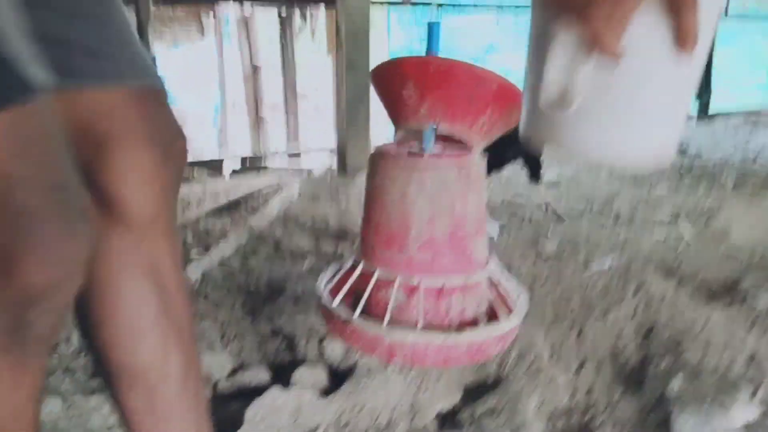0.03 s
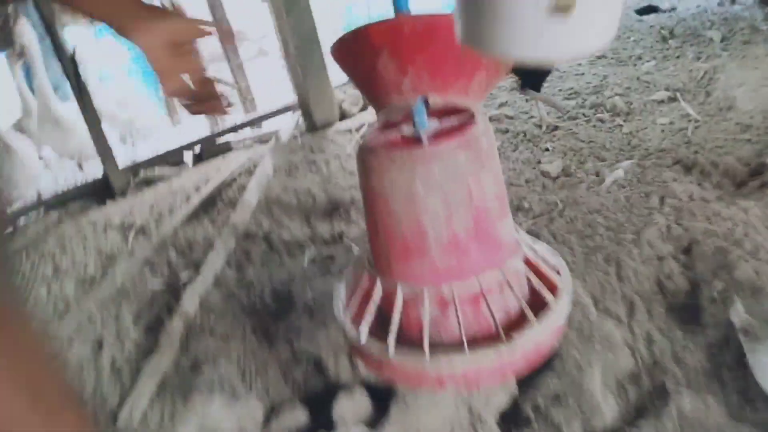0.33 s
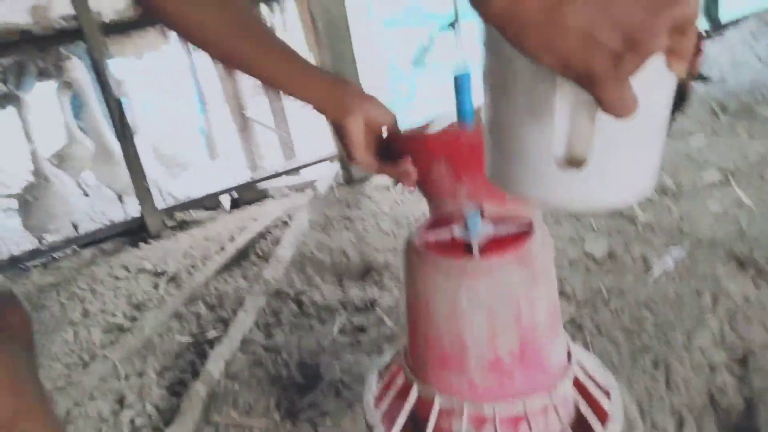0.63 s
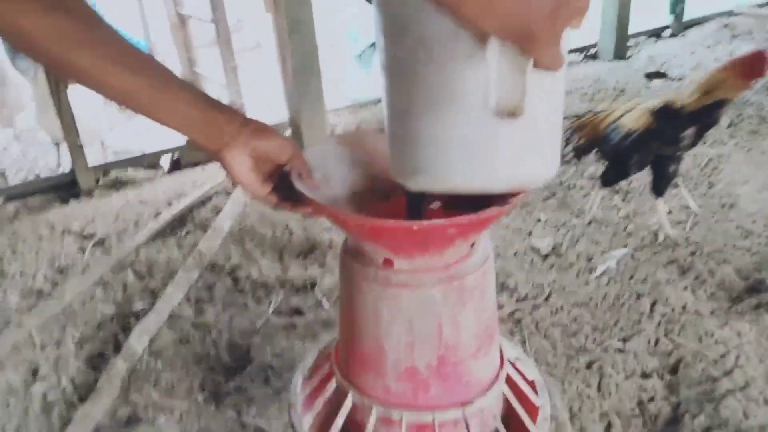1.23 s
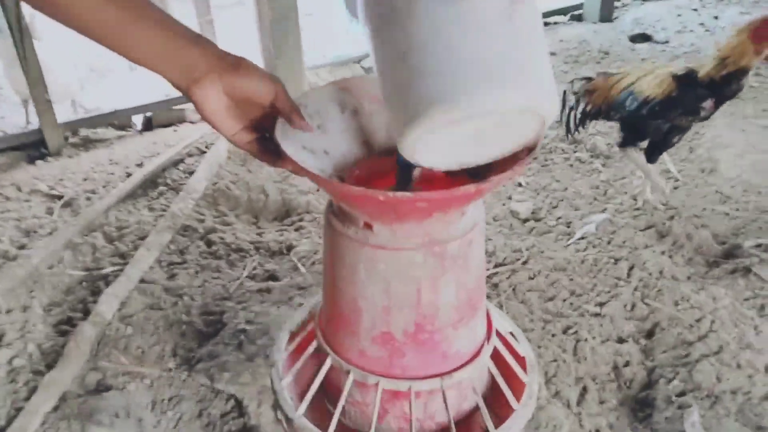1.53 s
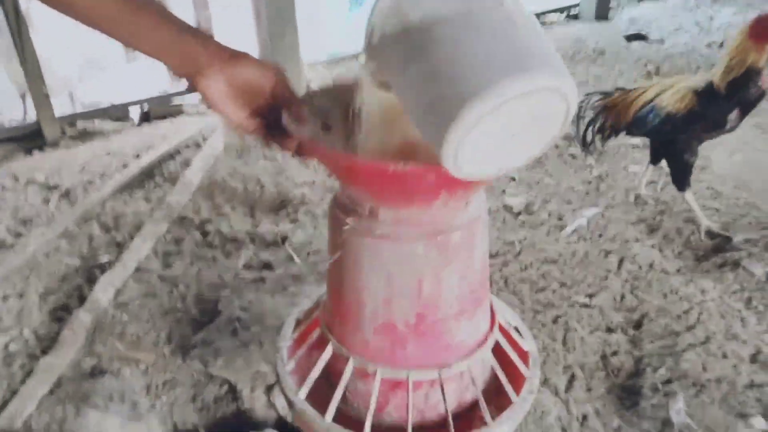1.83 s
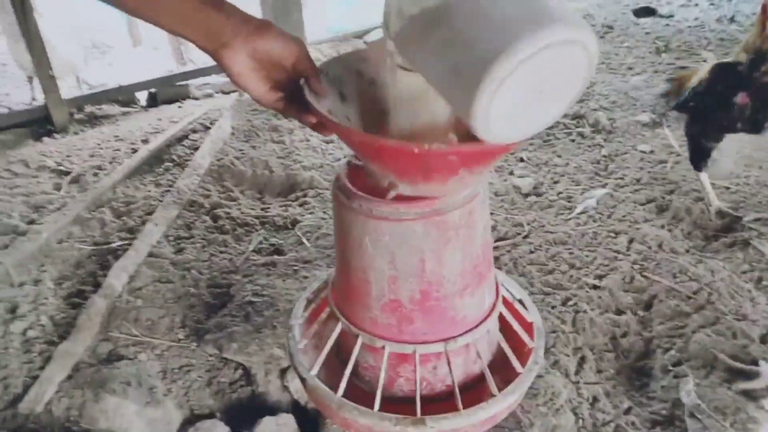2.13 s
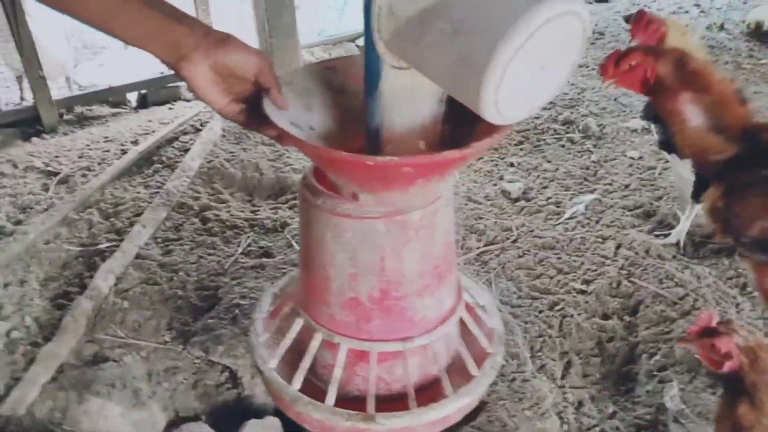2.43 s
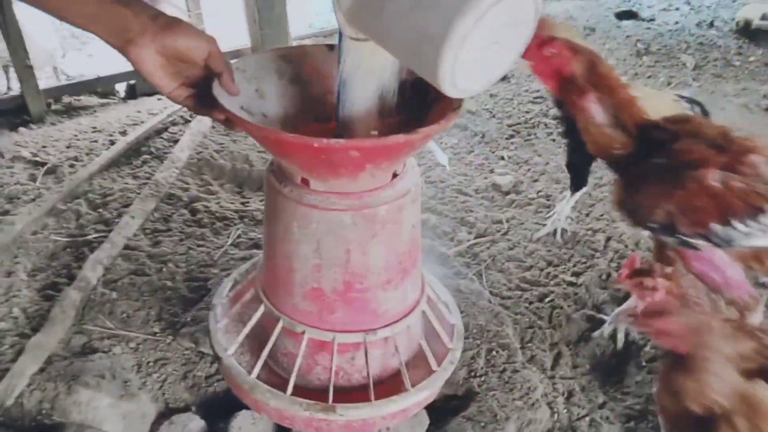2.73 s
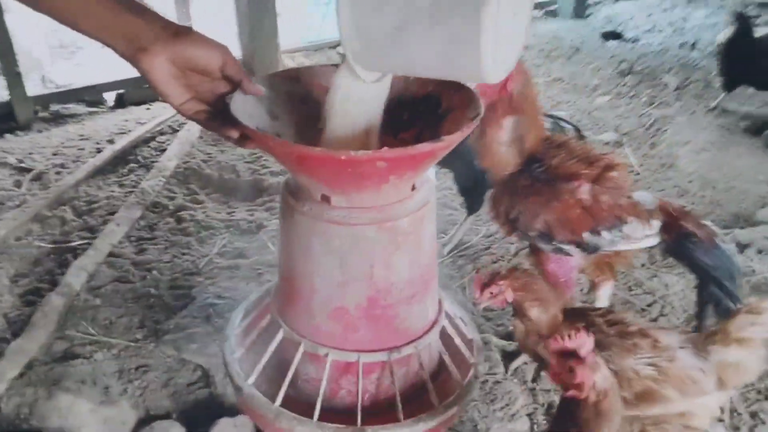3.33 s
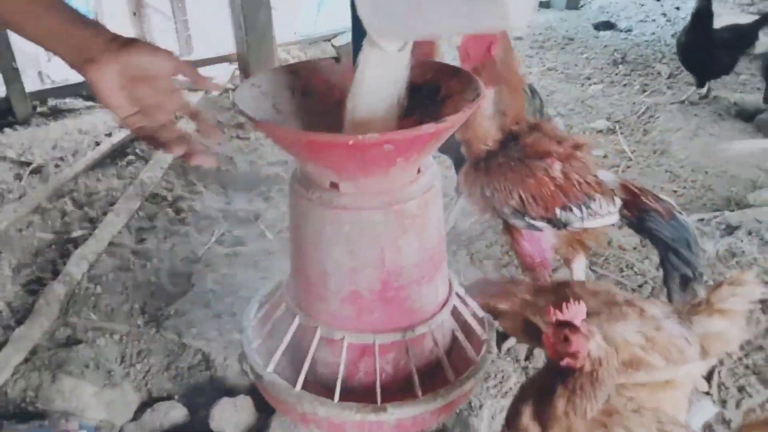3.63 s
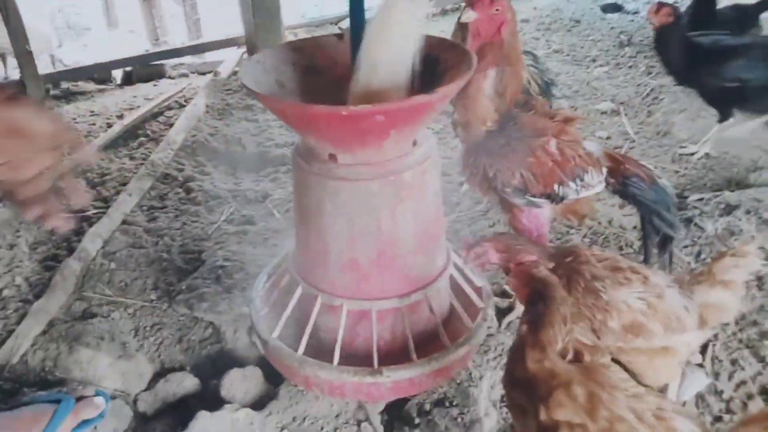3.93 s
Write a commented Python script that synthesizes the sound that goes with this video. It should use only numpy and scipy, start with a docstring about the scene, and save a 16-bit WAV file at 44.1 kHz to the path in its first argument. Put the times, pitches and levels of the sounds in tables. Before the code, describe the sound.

A chicken squawks hoarsely close by, then dry feed rushes through a plastic funnel.

```python
"""Feeding time in a dirt pen, with insects whining faintly behind. A chicken close by opens with
the first of four hoarse, drawn-out squawks: rasping throat pulses shaped by the beak. After a second
a plastic bucket knocks on a funnel and rings the hanging plastic feeder below it. Just before two
seconds dry feed starts to rush and hiss through the funnel and runs to the end, with a few more knocks.
Short clucks, sparse at first, come quicker after the last squawk as the birds gather."""
import sys
import numpy as np
from scipy import signal
from scipy.fft import rfft, irfft, next_fast_len
from scipy.io import wavfile
from scipy.ndimage import map_coordinates

SR = 44100
rng = np.random.default_rng(int(sys.argv[2]) if len(sys.argv) > 2 else 0)


def transcribe(signal):
    """Save signal, clipped to [-1, 1], as a 16-bit WAV file at the path in sys.argv[1]."""
    frames = np.atleast_2d(signal).T
    limited = np.clip(frames, -1, 1)
    pcm = np.round(limited * 32767).astype(np.int16)
    wavfile.write(sys.argv[1], SR, pcm)


N = 176400

# Stereo width of air and feed. Each row: frequency in Hz, left-right likeness (1 is mono).
STEREO_LIKENESS = [(150, 0.85), (400, 0.39), (950, 0.027)]
# Three throat tones for the squawks to choose from. Each row: frequency in Hz, gain in dB.
THROAT_1 = [(100, -13.5), (300, -9.5), (430, -17.5), (780, 0), (1000, -6.5), (1750, 1), (2350, -6),
            (2750, -4), (3750, -5.5), (7500, -30), (15000, -30.5)]
THROAT_2 = [(280, -2), (430, -18), (640, -0.5), (1400, 2), (1620, -9), (1800, 7.5), (2200, -6), (2400, 0),
            (2650, -10), (3650, -6), (4300, -18), (15000, -36.5)]
THROAT_3 = [(430, -21.5), (760, 0), (1150, 1), (2050, -1), (3150, -9.5), (3650, 4), (4200, -13),
            (8000, -31.5), (15000, -25.5)]
BEAK_DB = -11  # a beak resonance against the throat sound


def amp(db):
    return 10 ** (np.asarray(db) / 20)


def unit(x):
    return x / np.sqrt(np.mean(x ** 2) + 1e-20)


def along(points, hz):
    """Read a curve of (Hz, value) points on a log frequency axis."""
    freqs, values = np.transpose(points)
    return np.interp(np.log(hz + 1), np.log(freqs + 1), values)


def wobble(rate):
    """A smooth random curve, rate knots a second."""
    knots = rng.standard_normal(int(N * rate / SR) + 4)
    return map_coordinates(knots, [np.arange(N) * rate / SR])


def filtered(x, response):
    """Shape x with a gain given as a function of frequency."""
    n = x.shape[-1]
    padded = next_fast_len(n + 8192)
    return irfft(rfft(x, padded) * response(np.fft.rfftfreq(padded, 1 / SR)), padded)[..., :n]


def coloured(x, points, size=4096):
    """Minimum-phase EQ through (Hz, dB) points."""
    cepstrum = irfft(np.log(amp(along(points, np.fft.rfftfreq(size, 1 / SR)))))
    cepstrum[1:size // 2] *= 2
    cepstrum[size // 2 + 1:] = 0
    return signal.fftconvolve(x, irfft(np.exp(rfft(cepstrum))))[:len(x)]


def add(track, start_s, x):
    """Mix x into the track at start_s."""
    i = max(round(start_s * SR), 0)
    track[i:i + len(x)] += x[:max(N - i, 0)]


def panned(x, db):
    """Left louder than right by db."""
    return x * amp(np.array([[db], [-db]]) / 2)


def spread(pair, colour):
    """Two unrelated noises as coloured stereo of rms 1, narrow in the bass and wide on top."""
    def mid_side_gains(hz):
        angle = np.arccos(np.clip(along(STEREO_LIKENESS, hz), -1, 1)) / 2
        return amp(along(colour, hz)) * [np.cos(angle), np.sin(angle)]
    mid, side = filtered(pair, mid_side_gains)
    return unit(np.array([mid + side, mid - side]))


def pen(x, echo_db, left_lead_s=0, t60=.09):
    """Direct sound in stereo plus short echoes from ground, feeder and fence."""
    # Echo tone. Each row: frequency in Hz, level over the direct sound in dB before echo_db is added.
    echo_colour = [(300, 5), (1100, 14)]
    _, t, spectrum = signal.stft(rng.standard_normal((2, SR // 4)), SR, nperseg=256)
    tail = signal.istft(spectrum * amp(-60 * t / t60), SR, nperseg=256)[1]
    wet = signal.fftconvolve(x[None], tail / np.linalg.norm(tail[0]), axes=1)[:, :N]
    echo = lambda hz: amp(along(echo_colour, hz) + echo_db)
    lead = lambda hz: np.exp(1j * np.pi * hz * left_lead_s * np.array([[1], [-1]]))
    direct = filtered(x, lambda hz: lead(hz) / np.hypot(1, echo(hz)))
    return direct + filtered(wet, lambda hz: echo(hz) / np.hypot(1, echo(hz)))


def yard():
    """A bed of quiet outdoor air with a narrow insect whine and its octave."""
    # Tone of the air. Each row: frequency in Hz, gain in dB.
    air_colour = [(25, -16.5), (86, -14), (457, -22), (15500, -40.5)]
    air_db, insect_db, insect_hz = -47.5, -58.5, 5400
    air = spread(rng.standard_normal((2, N)), air_colour)
    band = lambda hz, centre: np.exp(-((hz - centre) / 380) ** 2)
    whine_bands = lambda hz: band(hz, insect_hz) + 0.81 * band(hz, 2 * insect_hz)
    whine = unit(filtered(rng.standard_normal((2, N)), whine_bands))
    return amp(air_db) * air + amp(insect_db) * whine


def syrinx(cycles, rasp, jitter_s=.00003, scatter_db=1.8):
    """A bird's voice: one uneven pulse and one puff of air per cycle; rasp is the air's share of power."""
    n = len(cycles)
    air = unit(rng.standard_normal(n) * np.exp(np.cos(2 * np.pi * cycles)))
    onsets = np.interp(np.arange(1, int(cycles[-1])), cycles, np.arange(n))
    chance = rng.standard_normal((len(onsets), 2))
    onsets += jitter_s * SR * chance[:, 0]
    taps = np.floor(onsets)[:, None] + np.arange(-7, 9)
    offset = taps - onsets[:, None]
    shapes = np.sinc(offset) * np.cos(np.pi * offset / 16) ** 2  # pulses can land between samples
    shapes *= amp(scatter_db * chance[:, 1:])
    pulses = np.bincount(np.clip(taps, 0, n - 1).astype(int).ravel(), shapes.ravel(), n)
    return np.sqrt(1 - rasp) * unit(pulses - pulses.mean()) + np.sqrt(rasp) * air


def beak(voice, hz, width_hz=74):
    """The beak's narrow resonance, its centre following hz, at rms 1."""
    spin = np.exp(2j * np.pi * np.cumsum(hz) / SR)
    pole = np.exp(-np.pi * width_hz / SR)
    return unit(np.real(spin * signal.lfilter([1 - pole], [1, -pole], voice / spin)))


def clucks():
    """Short, soft-edged notes of slightly falling pitch; the beak lifts a different harmonic in each."""
    # Each row: middle in seconds, length in seconds, pitch in Hz, level in dB, beak resonance in Hz.
    notes = [(0.858, 0.029, 252, -24, 556), (1.416, 0.02, 296.7, -18, 890), (1.76, 0.028, 221.8, -23, 2760),
             (2.275, 0.049, 261.3, -23, 1310), (2.462, 0.022, 254.8, -17.5, 1270),
             (2.571, 0.023, 296, -24, 590), (2.711, 0.025, 289, -20, 1210),
             (2.84, 0.026, 289.4, -21.5, 1130), (2.989, 0.031, 268.4, -20.5, 1080)]
    # Tone of the clucking throat. Each row: frequency in Hz, gain in dB.
    throat = [(70, -53), (250, -2), (560, 0), (1300, 0.5), (2700, -13.5), (8000, -45)]
    out, t = np.zeros(N), np.arange(-SR // 10, SR // 10) / SR
    fall = np.exp(-2.5 * t)
    for middle, length, hz, db, beak_hz in notes:
        voice = unit(coloured(syrinx(np.cumsum(hz * fall) / SR, rasp=.28), throat))
        swell = amp(db) * np.exp(-2 * np.pi * (t / length) ** 2)
        add(out, middle + t[0], swell * (voice + amp(BEAK_DB) * beak(voice, beak_hz * fall)))
    return panned(pen(out, echo_db=-7.5), db=2.5)


def squawks():
    """Hoarse calls: pitch and level arch with effort, the beak glides, two clean harmonics add body."""
    # Each row: start and end in seconds, top pitch in Hz, level in dB, second harmonic against the
    # call in dB, beak resonance at the start and at the end in Hz, throat tone.
    calls = [(-.05, 0.373, 169.8, -17, -15, 1330, 1126, THROAT_1),
             (0.602, 0.912, 152.2, -22.5, -37, 1400, 1433, THROAT_2),
             (1.326, 1.747, 162.1, -17.5, -26.5, 1240, 1340, THROAT_3),
             (1.963, 2.251, 135.3, -25, -16, 1250, 1330, THROAT_3)]
    rest_hz, fundamental_db, effort_db, attack_s, release_s = 111, -18.5, 3, 0.019, 0.099
    out, t = np.zeros((2, N)), np.arange(N) / SR
    for start, end, top_hz, db, second_db, beak_from_hz, beak_to_hz, throat in calls:
        progress = np.clip((t - start) / (end - start), 0, 1)
        effort = np.sin(np.pi * progress ** 1.3)  # crests just past the middle
        hz = rest_hz + (top_hz - rest_hz) * effort
        cycles = np.cumsum(hz * (1 + .012 * wobble(60))) / SR
        fades = np.clip((t - start) / attack_s, 0, 1) * np.clip((end - t) / release_s, 0, 1)
        level = fades * amp(db + effort_db * (effort - 1) + 1.1 * wobble(39.6))
        voice = unit(coloured(syrinx(cycles, rasp=.33), throat))
        beak_hz = beak_from_hz + (beak_to_hz - beak_from_hz) * progress
        resonances = beak(voice, beak_hz) + effort ** 2 * beak(voice, 2.33 * beak_hz)
        call = level * unit(voice + amp(BEAK_DB) * resonances)
        phase = 2 * np.pi * cycles
        body = amp(fundamental_db) * np.sin(phase) + amp(second_db) * np.sin(2 * phase)
        out += panned(pen(call, echo_db=-5, left_lead_s=0.00024), db=4)
        out += np.sqrt(2) * level * body  # dry and centred
    return out


def bucket_knocks():
    """Each contact thuds and rings the hollow feeder; a hard one also cracks and rings its thin wall."""
    # Each row: start in seconds, then the levels of ring, thud and clack in dB.
    contacts = [(1.062, -39, -30.5, -36.5), (1.1, -4, -13, -16), (1.1118, -13, -24, -29),
                (1.129, -6, -18, -27), (1.347, -40, -20.5, -55), (1.364, -35, -15, -21),
                (1.3765, -6, -21, -23.5), (2.238, -16, -13, -24), (2.282, -24, -21, -39),
                (2.732, -30, -19.5, -33), (3.92, -38, -28.5, -15.5)]
    # Modes of the plastic feeder. Each row: frequency in Hz, gain in dB, seconds to fall by 60 dB.
    modes = [(250, -12, .06), (345, 0, .13), (517, -3, .08), (830, -10, .06), (1380, -4, .075),
             (2670, -4, .08)]
    # Tones of the dull thud and the bright clack. Each row: frequency in Hz, gain in dB.
    thud_colour = [(40, -28), (150, -13.5), (280, -11), (1500, -36), (12000, -68)]
    clack_colour = [(100, -38), (600, 15), (1600, 3), (3800, -0.5), (9000, -22)]
    wall_hz = 1000  # modes above belong to the wall, those below to the hollow
    rise_s, crack_db = .002, 12
    out, t = np.zeros(N), np.arange(SR // 3) / SR
    decay = lambda t60: amp(-60 * t / t60)
    noise = lambda colour: unit(coloured(rng.standard_normal(len(t)), colour))
    rise = 1 - np.exp(-t / rise_s)
    for start, ring_db, thud_db, clack_db in contacts:
        ring = np.zeros(len(t))
        for hz, db, t60 in modes:
            drive_db = ring_db if hz < wall_hz else clack_db
            ring += amp(db + drive_db) * decay(t60) * np.sin(2 * np.pi * hz * t)
        thud = noise(thud_colour) * decay(t60=0.076)
        clack = noise(clack_colour) * (decay(t60=0.07) + amp(crack_db) * decay(t60=0.008))
        add(out, start, rise * (amp(ring_db) * ring + amp(thud_db) * thud) + amp(clack_db) * clack)
    return pen(out, echo_db=-11)  # the knocks carry little echo


def grains(per_s=18000):
    """Countless tiny impacts of random size, in two unrelated streams."""
    hits = rng.random((2, N)) < per_s / SR
    return hits * rng.standard_normal((2, N))


def feed_pour():
    """Feed strikes the funnel: a hollow rush that flutters with the flow, and a steadier fine hiss."""
    # The flow. Each row: time in seconds, rush in the funnel in dB, hiss of fine grains in dB.
    flow = [(1.81, -81, -89), (1.822, -39, -32), (1.94, -33, -31.5), (2.02, -20.5, -24.5), (2.22, -19, -22),
            (2.34, -21.5, -26), (2.65, -23.5, -27), (2.78, -26, -34), (3.1, -24.5, -30.5), (3.33, -26, -31),
            (3.45, -22.5, -26), (3.85, -27.5, -32.5)]
    # Tones of the rush and the hiss. Each row: frequency in Hz, gain in dB.
    rush_colour = [(100, -48), (400, -26.5), (620, -6), (920, 3), (1120, -0.5), (1350, 3.5), (1650, -3.5),
                   (2150, -2.5), (2650, -1), (5000, -10.5), (15000, -19)]
    hiss_colour = [(300, -17.5), (1500, -10.5)]
    times, *levels = np.transpose(flow)
    rush_db, hiss_db = [np.interp(np.arange(N) / SR, times, db) for db in levels]
    flutter_db = 1.33 * wobble(45)
    rush = amp(rush_db + flutter_db + 0.68 * wobble(130)) * spread(grains(), rush_colour)
    hiss = amp(hiss_db + 0.1 * flutter_db) * spread(grains(), hiss_colour)
    return panned(rush, db=2.5) + hiss


def scene():
    return squawks() + clucks() + bucket_knocks() + feed_pour() + yard()


def record(dry):
    """A steep cut takes off the very top of the treble."""
    return filtered(dry, lambda hz: hz < 15800)


dry = scene()
out = record(dry)
transcribe(out)
```